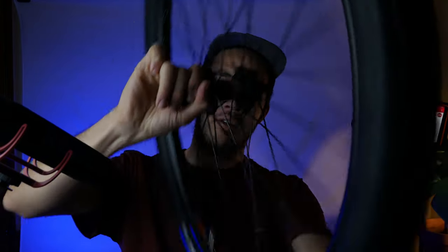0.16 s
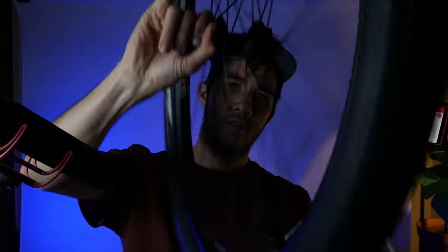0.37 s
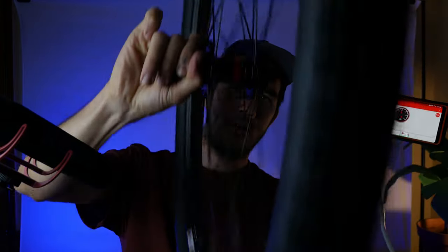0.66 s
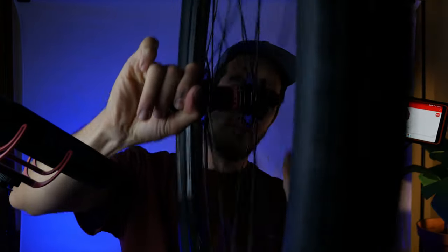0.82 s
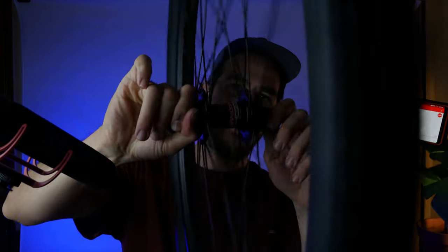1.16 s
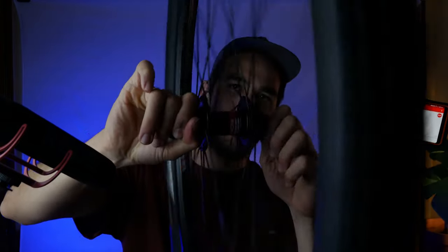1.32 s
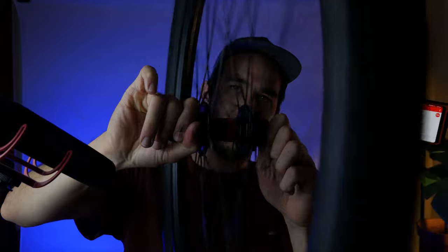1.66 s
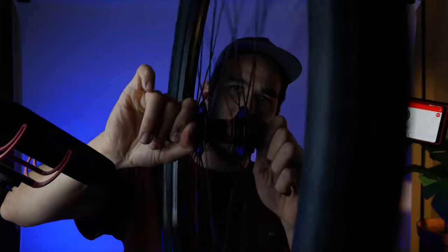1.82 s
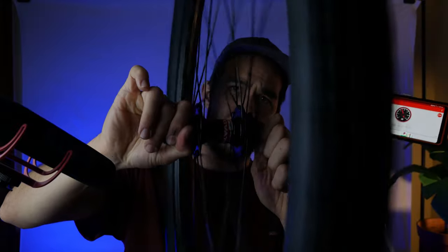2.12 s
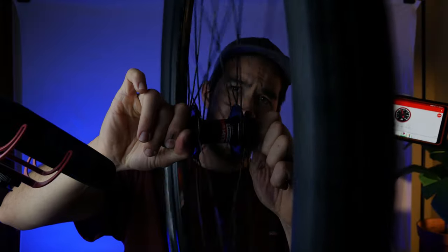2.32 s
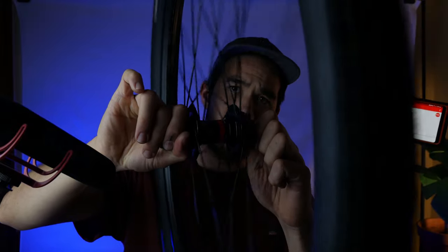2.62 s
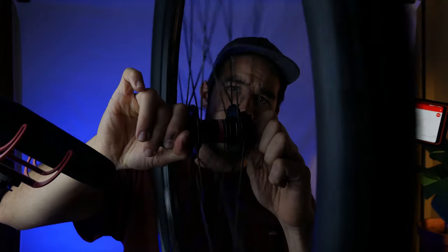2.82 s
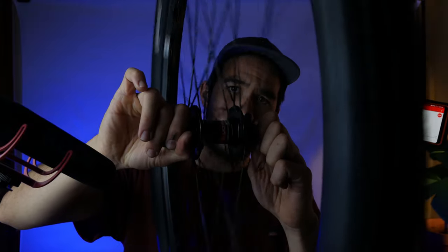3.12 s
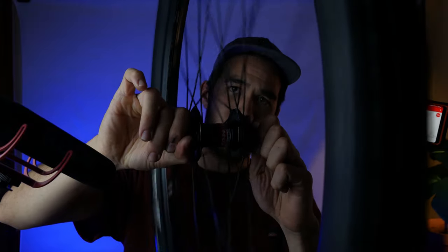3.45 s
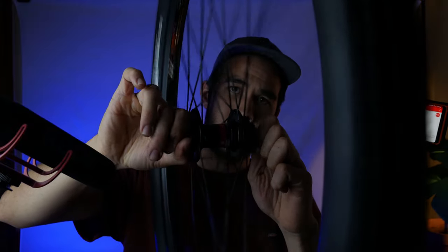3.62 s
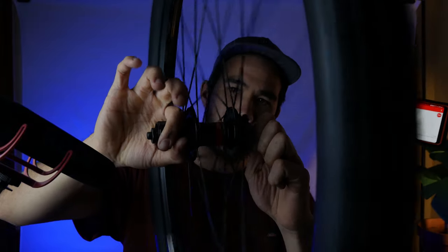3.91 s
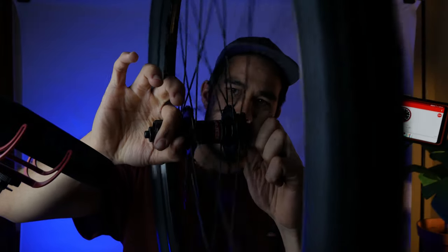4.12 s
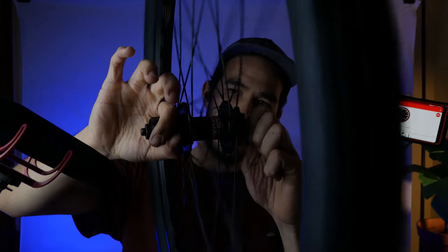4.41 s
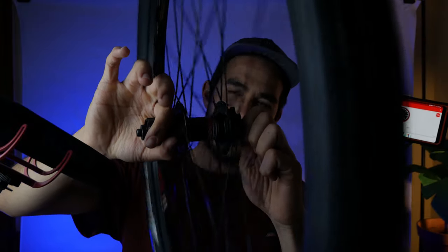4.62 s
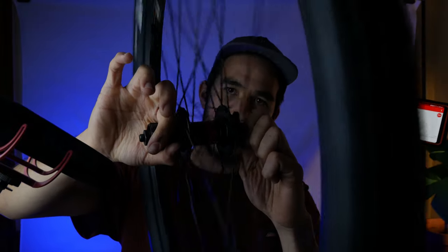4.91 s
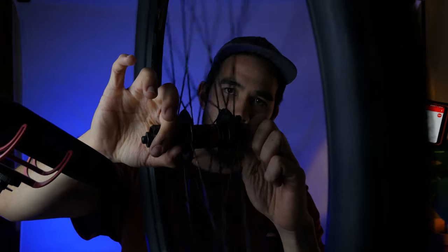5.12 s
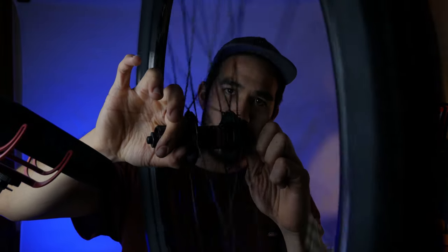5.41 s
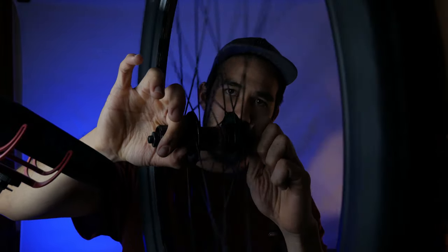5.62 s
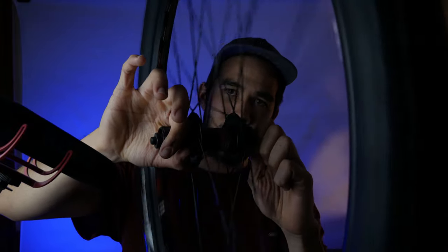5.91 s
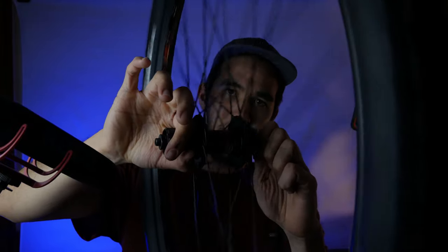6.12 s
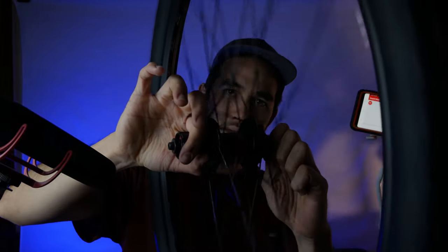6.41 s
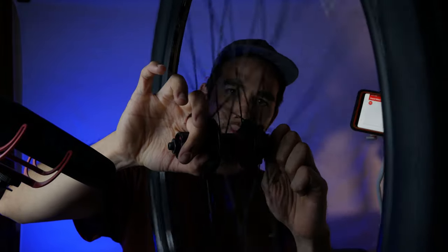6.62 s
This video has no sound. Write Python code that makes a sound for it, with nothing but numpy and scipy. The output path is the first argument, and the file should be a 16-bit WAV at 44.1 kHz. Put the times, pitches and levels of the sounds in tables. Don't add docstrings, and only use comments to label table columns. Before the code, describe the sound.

A bicycle wheel held by its axle spins close to one microphone in a small quiet room. The hub ratchet clicks sharp and dry, starting around eight a second, rising quickly to about fifteen, then easing to roughly ten. A soft push comes at the start and a hand rubs and slaps the tyre just before half a second. Faint hum and bearing hiss lie beneath.

```python
import sys
import numpy as np
from scipy import signal
from scipy.fft import rfft, irfft, next_fast_len
from scipy.io import wavfile
from scipy.ndimage import uniform_filter1d

SR = 44100
rng = np.random.default_rng(int(sys.argv[2]) if len(sys.argv) > 2 else 0)


def wav_out(sig):
    wavfile.write(sys.argv[1], SR, np.round(np.clip(np.atleast_2d(sig).T, -1, 1) * 32767).astype(np.int16))


def makeup_ratio(level_db):
    decades = np.asarray(level_db, float) / 20
    return 10 ** decades


N = 298116


def evened(x):
    return x / np.sqrt(np.mean(x ** 2) + 1e-20)


def read(points, hz):
    f, value = np.transpose(points)
    return np.interp(np.log(hz + 1), np.log(f + 1), value)


def curve(points):
    return np.interp(np.arange(N) / SR, *np.transpose(points))


def add(mix, s, sound):
    part = mix[round(s * SR):][:len(sound)]
    part += sound[:len(part)]


def shaped(x, gain):
    size = next_fast_len(len(x), real=True)
    hz = np.fft.rfftfreq(size, 1 / SR)
    return irfft(rfft(x, size) * gain(hz), size)[:len(x)]


def coloured(x, points):
    return shaped(x, lambda hz: makeup_ratio(read(points, hz)))


def ring(modes, detune, uneven_db, size):
    hz, db, t60 = np.transpose(modes)[:, :, None]
    t = np.arange(size) / SR
    shift, more = rng.standard_normal((2, len(modes), 1))
    decay = makeup_ratio(db + uneven_db * more - 60 * t / t60)
    return (decay * np.sin(2 * np.pi * hz * (1 + detune * shift) * t)).sum(0)


def lumps(size):
    values = rng.standard_normal(N // size + 2)
    return np.interp(np.arange(N) / size, np.arange(len(values)), values) * np.sqrt(3 / 2)


# time in seconds, rim turned towards it in dB,
# axle rocking in the fingers in dB, hub nearness in dB.
WHEEL_POSE = [(0.0, 3.5, -4, -1), (0.4, 3.9, -2.5, -6), (0.8, -7.5, 0, -2.5), (1.19, 6, 2.5, -6),
              (1.59, 0.4, 3, -5.5), (1.99, 1, 1.5, -1), (2.39, 5.5, -0.8, -2.4), (2.78, -0.5, 6.2, 2),
              (3.18, 5.5, 0, -1.1), (3.58, 0.5, 9, 4.2), (3.98, 0.5, -2, 4.5), (4.37, -5, -2.5, 4.5),
              (4.77, -0.1, -6, 2.5), (5.17, -2.6, -4, 6), (5.57, -0.3, -2, 3.5), (5.96, -1, -5, 3),
              (6.36, 2.5, 1, 2), (6.76, -12.5, -2.3, 6)]


def pose(column):
    return curve(np.array(WHEEL_POSE)[:, [0, column]])


# time in seconds, teeth a second.
WHEEL_SPEED = [(0.0, 7.926), (0.2417, 12.168), (0.3871, 14.315), (0.6899, 14.548), (0.7138, 13.779),
               (1.0428, 15.101), (1.1925, 14.197), (1.6517, 14.956), (2.0911, 13.713), (2.5606, 13.493),
               (2.8406, 13.807), (3.3235, 13.051), (3.458, 12.404), (3.8832, 13.178), (4.7198, 11.612),
               (5.0838, 11.622), (5.3825, 11.464), (6.7578, 10.418)]


def passed():
    return np.cumsum(curve(WHEEL_SPEED)) / SR


def landings():
    return np.r_[0, np.flatnonzero(np.diff(np.floor(passed())))]


TEETH_PER_TURN = 15


def swell(peak_tooth, count):
    return np.cos(2 * np.pi * count * (passed() - peak_tooth) / TEETH_PER_TURN)


# frequency in Hz, level in dB, t60 in seconds.
RIM_MODES = [(1700, -8, .012), (1950, -3, .007), (2320, -2, .008), (2570, -2, .009), (2900, 0, .005)]
LOW_SHELL_MODES = [(3250, -2, .004), (3750, 0, .006), (4250, -3, .004)]
SHELL_MODES = [(5000, -6, .004), (5600, 0, .007), (6050, -4, .004), (6700, -6, .004)]
PAWL_MODES = [(8200, -8, .004), (8800, -3, .005), (9350, 0, .0075), (10100, -6, .004), (10800, -8, .004)]
SPRING_MODES = [(11600, -0.5, 0.004), (12420, 2, 0.0045), (13400, -0.5, 0.004), (14200, -7, 0.004),
                (15700, -30, .003)]
THUD_MODES = [(560, -11, .01), (800, 0, .016), (1250, -7, .008)]
SPOKE_MODES = [(1690, -2, .1), (2020, -5, .05), (2330, -1, .055), (2560, 0, .085)]
TYRE_MODES = [(752, 0, .15), (870, -6, .045)]
FLANGE_MODES = [(3470, 0, 0.019), (3740, -9, 0.13), (4030, -3, 0.066), (5480, -12, 0.096), (5730, 8, 0.058)]


def tooth(bands, rim_db, low_db, shell_db, pawl_db, lag_ms, spring_db, tyre_db, spoke_db):
    when, strength = rng.random((2, 8))
    when[:2] = 0, 1
    strength[:2] = 1.5, .7
    fade = np.where(np.arange(8) > 1, .75 - 0.29 * when, 1)
    at = np.clip(when * max(lag_ms - .45, .3) * SR / 1000, 0, 399).astype(int)
    blows = np.zeros(400)
    np.add.at(blows, at, strength * fade)

    quick_parts = (RIM_MODES, LOW_SHELL_MODES, SHELL_MODES, PAWL_MODES, SPRING_MODES, THUD_MODES)
    slow_parts = (SPOKE_MODES, TYRE_MODES, FLANGE_MODES)
    quick = [ring(part, detune=.018, uneven_db=3, size=500) for part in quick_parts]
    slow = [ring(part, detune=.007, uneven_db=3, size=3000) for part in slow_parts]
    levels_db = (rim_db, low_db, shell_db, pawl_db, (shell_db + pawl_db) / 2 + spring_db,
                 tyre_db - 8.0, rim_db + spoke_db, tyre_db - 9.5, (low_db + shell_db) / 2)
    out = np.zeros(3400)
    for part, db, (band, more_db) in zip(quick + slow, levels_db, bands):
        rung = signal.sosfilt(band, signal.convolve(part, blows))
        add(out, 0, makeup_ratio(db + more_db) * rung / np.linalg.norm(rung))
    return out


# lowest frequency in Hz, highest frequency in Hz, level in dB.
PART_BANDS = [
    (1665, 4830, 1.5),
    (2910, 4700, 0.85),
    (5005, 7070, 0.53),
    (7715, 11000, 0.13),
    (11530, 14800, -7),
    (370, 1400, -23),
    (1650, 3100, -11),
    (574, 1300, -21),
    (3200, 5640, -15.5),
]
# mean energy in dB, share of rim turn, of rocking,
# of nearness [dB per dB].
PART_LAWS = [
    (-13, 0.95, -0.082, 0.01),
    (-6.5, 0.29, 0.85, 0.01),
    (-2.5, 0.14, 0.17, 1.29),
    (-.5, 0.41, -0.064, 0.84),
]
# time in seconds, extra dB in rim and low shell,
# extra dB in shell, extra dB in pawls.
ODD_TEETH = [(0.36, -3.5, 2, 2), (0.5, -5, -4.1, -1.5), (0.57, -3.5, -3.1, -2.5), (0.64, 0.5, -1, -4),
             (0.71, -3, 1.5, -3.5), (0.78, -2.5, 1.5, 2.5), (0.85, 1, -2.5, 5), (0.99, -0.5, 5, -1.5),
             (1.33, 2.5, -5, -4.3), (1.47, -0.5, 4, 4.5), (1.54, 1.5, 5.5, 4), (1.6, -0.3, 7.5, -3),
             (1.67, 0.2, -2, -3.8), (1.74, -2.5, 3, -4), (1.81, -0.3, 5.5, -3.5), (2.38, -3.5, -4.9, 2.5),
             (2.46, 0.5, -1.3, 4), (2.75, -8, -6, 5), (3.12, -2.5, 6.5, -2.7), (3.74, -2, 1.5, -6),
             (4.13, -8.5, -2.7, -4.9), (4.7, -2.2, -1.5, -2), (4.87, 2, 5, 2.5), (5.05, 0.5, -6.5, 0.7),
             (5.39, -3, -12, -4.5), (5.57, 0, 3.5, -1.8), (5.75, -3, -3.2, -2.5), (6.2, 0.0, 3.5, 2.5),
             (6.57, 1.0, 0.5, 2.5), (6.67, 1.0, -0.5, 3.5)]
SCATTER_DB = 1.3
LEAD_S = .0005
LAG_MS, LAG_SWING_MS, LAG_PEAK_TOOTH, LAG_SCATTER_MS = 1.15, 1.5, 2.0, .25
SPRING_DB, SPRING_PER_NEAR = -0.5, -0.51
TYRE_DB, TYRE_SWING_DB, TYRE_PEAK_TOOTH, TYRE_PER_NEAR = 0.5, 4, -1.9, 0.46
SPOKE_SWING_DB, SPOKE_PEAK_TOOTH = 3.0, 5.6


def ratchet():
    out, at = np.zeros(N), landings()
    bands = []
    for low_hz, high_hz, db in PART_BANDS:
        bands.append((signal.butter(3, [low_hz, high_hz], "band", fs=SR, output="sos"), db))
    held = np.array([np.ones(N), pose(column=1), pose(column=2), pose(column=3)])[:, at]
    near_db = held[3]
    chance = rng.standard_normal((len(at), 7)).T

    parts_db = np.array(PART_LAWS) @ held + SCATTER_DB * chance[:4]
    for s, low_db, shell_db, pawl_db in ODD_TEETH:
        k = abs(at / SR - s).argmin()
        extra_db = np.array([low_db, low_db, shell_db, pawl_db])
        parts_db[:, k] += extra_db - SCATTER_DB * chance[:4, k] * [0, 0, 1, 1]

    lateness = ((1 + swell(LAG_PEAK_TOOTH, count=1)[at]) / 2) ** 2
    lag_ms = LAG_MS + LAG_SWING_MS * lateness + LAG_SCATTER_MS * chance[4]
    spring_db = SPRING_DB + SPRING_PER_NEAR * near_db + SCATTER_DB * chance[5]
    tyre_db = TYRE_DB + TYRE_SWING_DB * swell(TYRE_PEAK_TOOTH, count=2)[at]
    tyre_db += TYRE_PER_NEAR * near_db + SCATTER_DB * chance[6]
    spoke_db = SPOKE_SWING_DB * swell(SPOKE_PEAK_TOOTH, count=1)[at]
    for sample, row in zip(at, np.vstack([parts_db, lag_ms, spring_db, tyre_db, spoke_db]).T):
        add(out, max(sample / SR - LEAD_S, 0), tooth(bands, *row))
    return out


# frequency in Hz, level in dB per Hz.
AIR_COLOUR = [(15, -14), (40, 5.5), (90, -6), (200, -7.5), (400, -13.5), (600, -11), (1300, -13),
              (2000, -6), (3500, -21), (5500, -12), (7300, -24), (9300, -11), (13000, -32), (16000, -40)]
AIR_DB = -58
# frequency in Hz, width in Hz, level in dB.
BEARING_BANDS = [(767, 160, -12), (846, 40, -16), (1680, 250, 0.5), (1970, 180, -22), (2630, 85, -11),
                 (14800, 80, -18)]
# frequency in Hz, level in dB rms.
MAINS_HUM = [(60, -50), (120, -92), (243, -78)]
BEARING_DB, BEARING_SWING_DB, BEARING_PEAK_TOOTH, BEARING_PER_RIM = -62, 2.5, 5, 0.15
BEARING_FADE_S, BEARING_FADE_DB_PER_S = 6.5, -78
STIR_DB, STIR_DB_PER_S, STIR_PER_ROCK, STIR_LUMPS_DB = -62, -1.49, 0.27, 2.5
SWAY_DB, SWAY_DB_PER_S, SWAY_PER_ROCK, SWAY_LUMPS_DB = -59, -3.5, .8, 6


def background():
    t = np.arange(N) / SR
    bearing_db = BEARING_DB + BEARING_SWING_DB * swell(BEARING_PEAK_TOOTH, count=1)
    bearing_db += BEARING_PER_RIM * pose(column=1)
    bearing_db += BEARING_FADE_DB_PER_S * np.maximum(t - BEARING_FADE_S, 0)
    out = makeup_ratio(AIR_DB) * evened(coloured(rng.standard_normal(N), AIR_COLOUR))
    for f, width, db in BEARING_BANDS:
        slow_t = t[::2000]
        slow = evened(uniform_filter1d(rng.standard_normal(len(slow_t)), size=2))
        waver = np.interp(t, slow_t, slow)
        narrow = shaped(rng.standard_normal(N), lambda hz: 1 / (1 + (2 * (hz - f) / width) ** 4))
        out += makeup_ratio(bearing_db + db + 3.8 * waver) * evened(narrow)

    rocking_db = pose(column=2)
    rumble = shaped(rng.standard_normal(N), lambda hz: (hz > 12) / (1 + (hz / 38) ** 4))
    sway_db = SWAY_DB + SWAY_DB_PER_S * t + SWAY_PER_ROCK * rocking_db + SWAY_LUMPS_DB * lumps(size=5000)
    out += makeup_ratio(sway_db) * evened(rumble)
    stirred = shaped(rng.standard_normal(N),
                     lambda hz: 1 / (1 + (75 / (hz + 1)) ** 4) / (1 + (hz / 220) ** 2))
    stir_db = STIR_DB + STIR_DB_PER_S * t + STIR_PER_ROCK * rocking_db + STIR_LUMPS_DB * lumps(size=2500)
    out += makeup_ratio(stir_db) * evened(stirred)
    return out + sum(makeup_ratio(db) * np.sqrt(2) * np.sin(2 * np.pi * f * t + 1.3) for f, db in MAINS_HUM)


# start in seconds, level in dB, brightness in Hz, ring of the cavity in dB,
# ring of the casing in dB.
KNOCKS = [(.0535, -16, 900, -60, -50), (.0537, -30, 3500, -50, -50), (3.564, -38, 4500, -40, -40),
          (3.57, -26, 500, -50, -44), (3.972, -28, 500, -50, -44), (.384, -40, 1500, -22, -14),
          (.395, -33, 3000, -30, -22), (.4325, -34, 2500, -24, -1), (.4440, -36, 2500, -22, -6),
          (.4475, -30, 1500, -3, -16), (2.03, -42, 1000, -26, -12), (4.938, -44, 1500, -36, -20)]
# frequency in Hz, level in dB, t60 in seconds.
CAVITY_MODES = [(85.4, -5.5, 0.27), (231, -43, 0.023), (256, 3, 0.069), (372, -1.5, 0.11)]
CASING_MODES = [(840, 7, 0.07), (910, 2, 0.061), (1400, 2, 0.018), (1970, 1, .02), (2550, -13, .02)]
# time in seconds, level in dB.
RUB_LEVEL = [(.28, -85), (.35, -49.5), (.365, -38), (.4, -40), (.41, -47), (.43, -45), (.445, -35),
             (.46, -49), (.7, -74)]
# frequency in Hz, level in dB per Hz.
RUB_COLOUR = [(100, -17), (300, -6), (700, -6.5), (1500, -7.5), (2600, -0.5), (4300, -8.5), (6000, -20),
              (10000, -17), (15500, -48)]


def hand():
    out = np.zeros(N)
    for s, db, bright_hz, cavity_db, casing_db in KNOCKS:
        push = np.hanning(int(SR / bright_hz) + 3)
        body = makeup_ratio(cavity_db) * ring(CAVITY_MODES, detune=.01, uneven_db=1, size=6000)
        body += makeup_ratio(casing_db) * ring(CASING_MODES, detune=.02, uneven_db=2, size=6000)
        body[0] -= 4.0
        add(out, s, makeup_ratio(db) * np.convolve(body, push / push.sum()))
    slip_db = 1.87 * rng.exponential(1, N // 40 + 1).repeat(40)[:N]
    slips = rng.standard_normal(N) * makeup_ratio(slip_db)
    out += makeup_ratio(curve(RUB_LEVEL)) * evened(coloured(slips, RUB_COLOUR))
    return signal.sosfilt(signal.butter(2, 75, "high", fs=SR, output="sos"), out)


# frequency in Hz, level in dB.
ALL_ROUND_COLOUR = [(400, -30), (800, -7.5), (1300, -12.5), (1700, -1.5), (2500, -1.5), (3100, -6.5),
                    (3900, -2.5), (4600, -1.5), (5600, -2.5), (7300, -9), (9100, 2.5), (11500, -9.5),
                    (14000, -20), (15400, -22)]
ALL_ROUND_DB = 5


def all_round():
    out, click = np.zeros(N), coloured(signal.unit_impulse(256, "mid"), ALL_ROUND_COLOUR)
    click /= np.linalg.norm(click)
    for s in landings() / SR:
        add(out, max(s - 128 / SR, 0), makeup_ratio(ALL_ROUND_DB + 2 * rng.standard_normal()) * click)
    return out


# frequency in Hz, t60 in seconds.
ROOM_DECAY = [(300, 0.7), (1500, 0.11), (4000, 0.2), (9000, 0.16), (15000, 0.2)]
# delay in seconds, spread in seconds, level
# against the rest of the tail in dB.
EARLY_DIPS = [(0.01, 0.015, -1.5), (.022, 0.0017, -6)]
ROOM_DB, ROOM_PER_NEAR = -17, -0.21


def room(x):
    out, turn = np.zeros(N), 2 * np.pi * 2.6 * np.arange(N) / SR
    sent = x * makeup_ratio(ROOM_DB + ROOM_PER_NEAR * pose(column=3))
    for k in range(3):
        taps = np.zeros(SR // 2)
        at = np.arange(150, len(taps) - 10, 10)
        near_db = sum(db * np.exp(-((at / SR - s) / spread) ** 2) for s, spread, db in EARLY_DIPS)
        taps[at + rng.integers(0, 10, len(at))] = rng.choice([-1., 1.], len(at)) * makeup_ratio(near_db)
        hz, t, z = signal.stft(taps, SR, nperseg=256)
        decay = makeup_ratio(-60 * t / read(ROOM_DECAY, hz)[:, None])
        tail = signal.istft(z * decay, SR, nperseg=256)[1]
        share = np.sqrt(2 / 3) * np.cos(turn + k * np.pi / 3)
        out += signal.oaconvolve(sent * share, tail / np.linalg.norm(tail))[:N]
    return out


def shaded(x):
    hz, t, z = signal.stft(x, SR, nperseg=512)
    patches = uniform_filter1d(rng.standard_normal(z.T.shape), size=30, axis=0)
    patches = uniform_filter1d(patches, size=7, axis=1)
    patches = uniform_filter1d(patches, size=12, axis=0)
    shade_db = 2.5 * evened(patches.T)
    return signal.istft(z * makeup_ratio(shade_db), SR, nperseg=512)[1][:N]


# frequency in Hz, half width in Hz, level in dB.
OFF_AXIS_BANDS = [(3180, 170, 1), (4830, 230, -3), (7430, 720, 0.5)]
QUIET_EDGE_HZ = 15600


def off_axis(hz):
    off_axis_db = sum(db * np.exp(-((hz - centre_hz) / width) ** 2) for centre_hz, width, db in OFF_AXIS_BANDS)
    return (hz < QUIET_EDGE_HZ) * makeup_ratio(off_axis_db)


def scene():
    direct = ratchet() + hand()
    faint = shaded(room(makeup_ratio(-7.0) * direct + all_round())) + background()
    return np.tile(direct + shaped(faint, off_axis), (2, 1))


def roll_off(x):
    return signal.sosfilt(signal.butter(12, 16840, fs=SR, output="sos"), x)


# frequency in Hz, side against mid in dB.
SIDE_COLOUR = [(60, -22), (150, -22), (350, -20), (700, -18.5), (1400, -19), (2800, -22.5), (5500, -24),
               (10000, -23), (14000, -19)]
SIDE_SHARE, SIDE_DB = .27, -14.5
SIDE_FOLLOW = 0.63


def record(dry):
    dry = dry / (1 + abs(dry) ** 6) ** (1 / 6)
    hz, t, z = signal.stft(dry[0], SR, nperseg=256)
    grain = np.exp(2j * np.pi * rng.random(z.shape))
    tiles = rng.random((z.shape[1] // 8 + 1, len(hz) // 4 + 1)).repeat(8, axis=0).repeat(4, axis=1).T
    differs = tiles[:len(hz), :len(t)] < SIDE_SHARE
    side_gain = makeup_ratio(read(SIDE_COLOUR, hz) + SIDE_DB)[:, None]
    side = abs(z) ** SIDE_FOLLOW * grain * differs * side_gain
    side = signal.istft(side, SR, nperseg=256)[1][:N]
    return roll_off(0.91 * (dry + [side, -side]))


dry = scene()
out = record(dry)
wav_out(out)
```